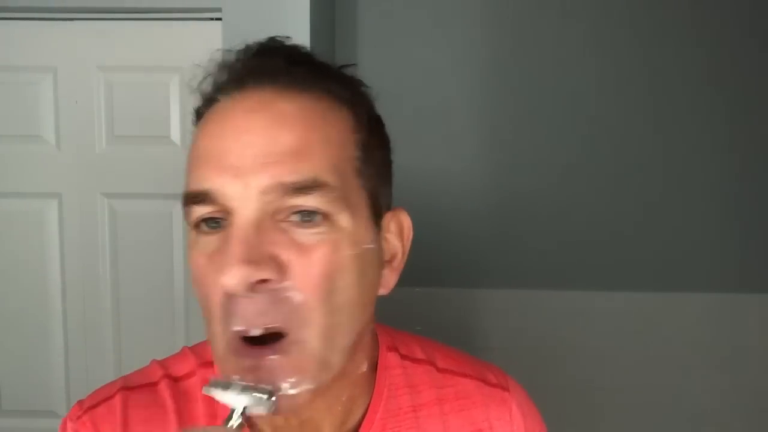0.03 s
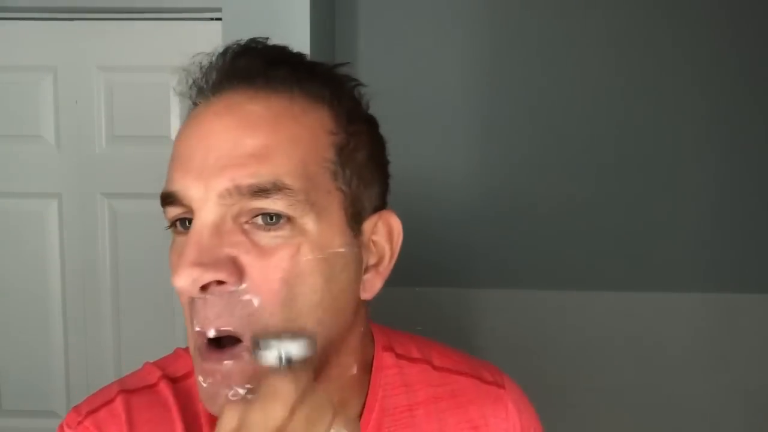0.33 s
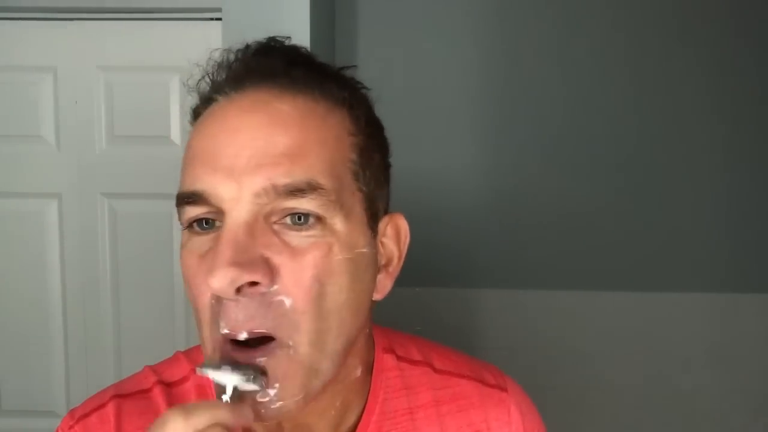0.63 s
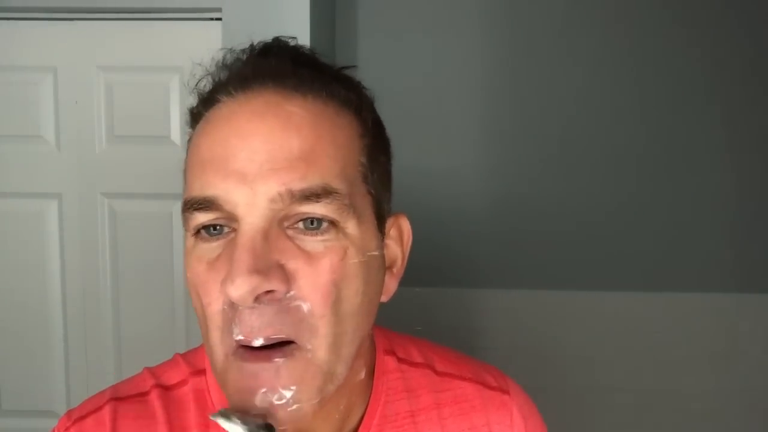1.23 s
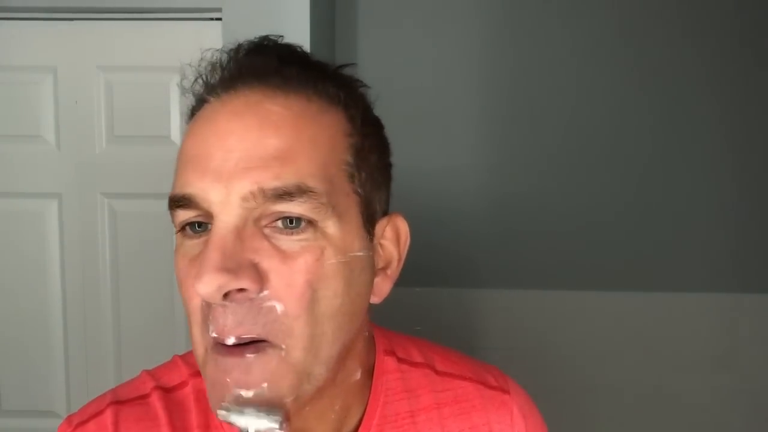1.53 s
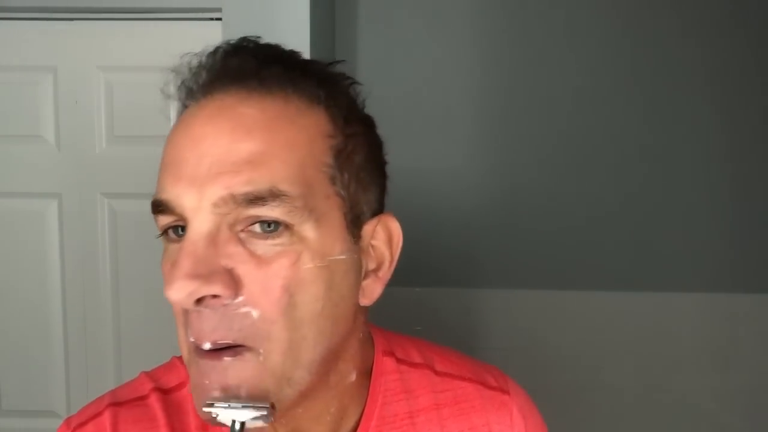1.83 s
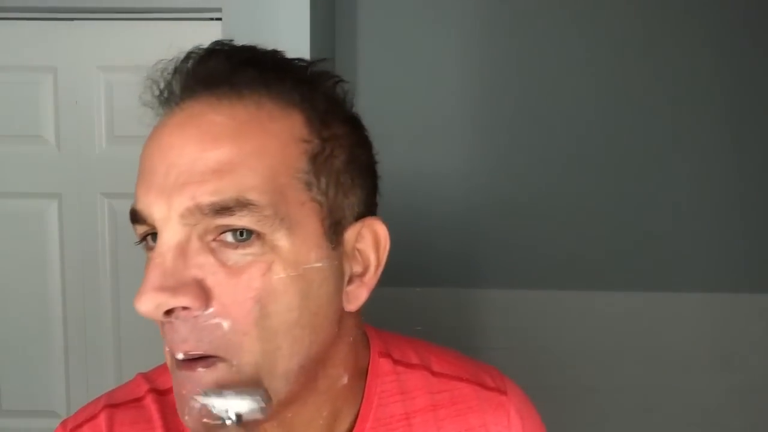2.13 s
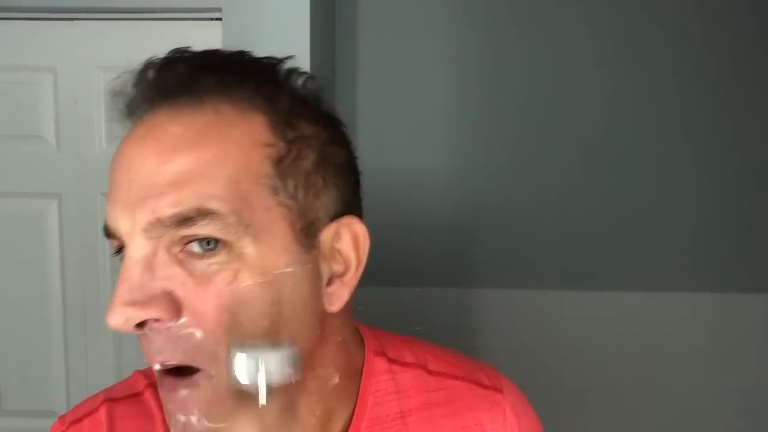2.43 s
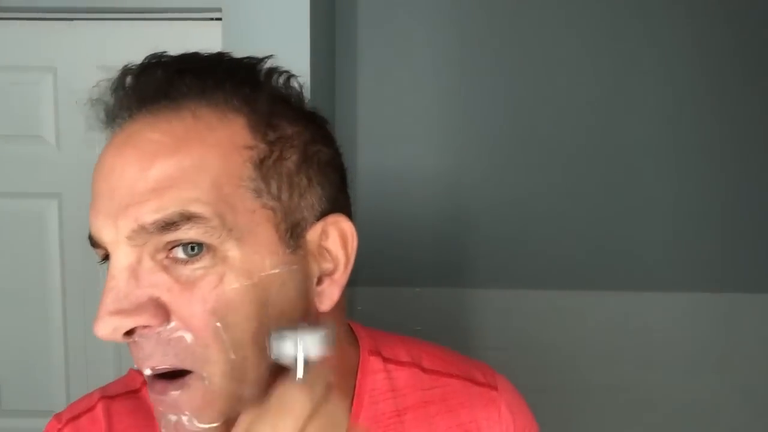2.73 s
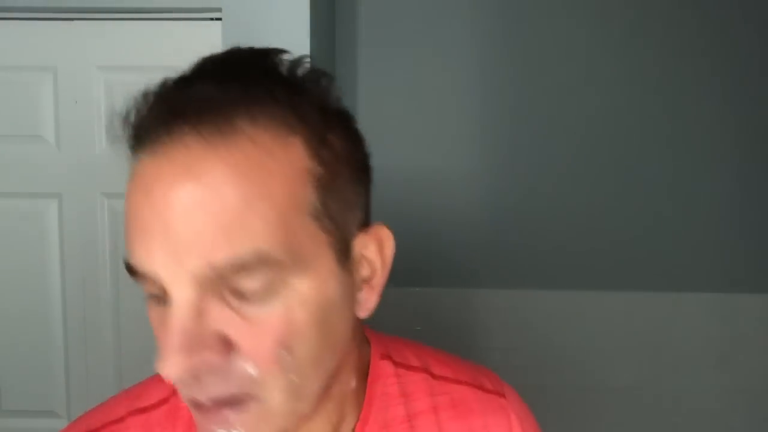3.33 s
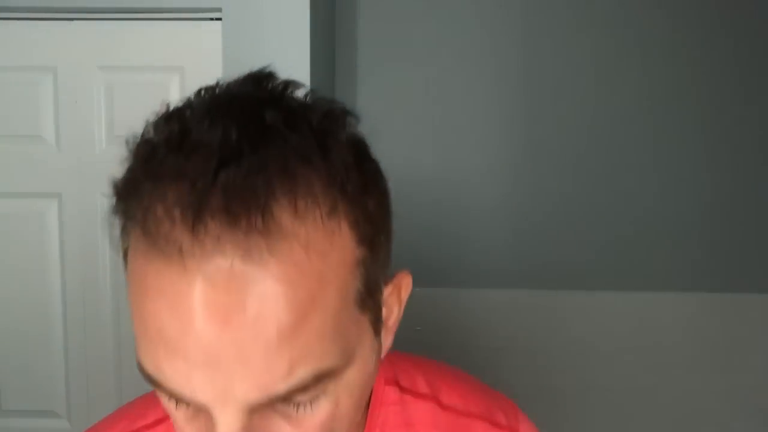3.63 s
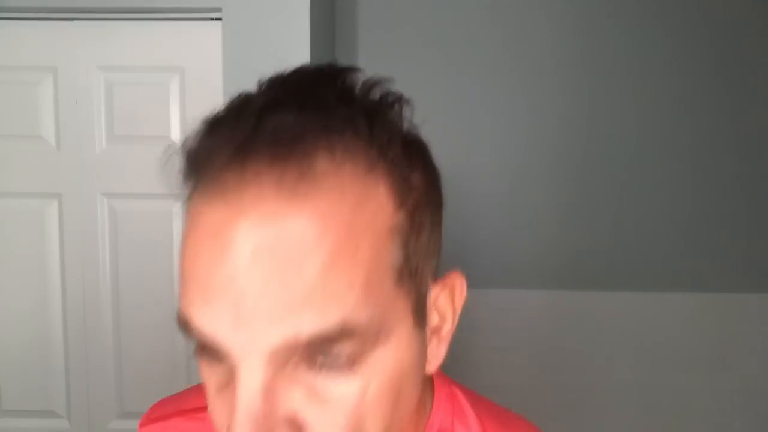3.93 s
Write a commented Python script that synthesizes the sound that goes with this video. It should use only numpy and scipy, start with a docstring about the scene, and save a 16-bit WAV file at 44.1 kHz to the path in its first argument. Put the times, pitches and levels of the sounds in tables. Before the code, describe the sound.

A razor scrapes stubble in about ten short, soft, crackly strokes from 0.3 to 3.5 seconds, the clearest near 1 and 1.6 seconds. Low ventilation rumbles underneath in a small bathroom, and a shirt rustles faintly. At about 3.8 seconds everything cuts out for an instant, then a much louder tap splashes into a basin with a gurgling drain until the end at 4 seconds.

```python
"""Shave, then a running tap.

A safety razor scrapes stubble in short strokes in a small hard-walled bathroom, over ventilation rumble
and a faint shirt rustle. Each stroke is a shower of hair snaps that ring the blade; stiff hairs tick
singly. After a brief dead silence a tap is running: spray spatters in the basin, the drain gurgles."""
import sys
import numpy as np
from scipy import signal
from scipy.fft import rfft, irfft, next_fast_len
from scipy.io import wavfile

SR = 44100
rng = np.random.default_rng(int(sys.argv[2]) if len(sys.argv) > 2 else 0)


def transcribe(u):
    """Save the signal u as a 16-bit wav file named by the first command-line argument.

    u: samples, shape (n,) or (channels, n), limited to [-1, 1]; the rate is SR.
    q: integer samples, one column per channel.
    """
    v = np.clip(np.atleast_2d(u).T, -1, 1)
    q = np.round(v * 32767).astype(np.int16)
    wavfile.write(sys.argv[1], SR, q)


N = 176400

# ventilation rumble (frequency [Hz], relative density [dB])
RUMBLE_SPECTRUM = [(15, -30), (25, -25.5), (60, -0.5), (96, -0.5), (128, 2), (162, -8), (189, -4),
                   (214, -12.5), (265, -8.5), (295, -10.5), (329, -18), (361, -12.5), (415, -17),
                   (565, -15), (659, -22), (857, -23.5), (1000, -32.5), (1300, -60.5), (2200, -120)]
# duct drone (frequency [Hz], width [Hz], relative level [dB])
DUCT_MODES = [(121.4, 14.5, -4), (185, 5.3, -6), (253.4, 15, -9.5), (293, 14, -11), (368, 10, -11)]
# room hiss (frequency [Hz], relative density [dB])
HISS_SPECTRUM = [(500, -28.5), (900, -2.5), (1150, 1), (1550, -4.5), (2200, -14), (3800, -16.5),
                 (7700, -9.5), (8300, -20), (15500, -12.5)]
# soft low swells (start [s], peak [s], decay [s], level [dB])
LOW_SWELLS = [(0.693, 0.765, 0.054, -54.5), (3.33, 3.364, 0.085, -54)]
# their resonance (frequency [Hz], width [Hz], relative level [dB])
LOW_SWELL_MODE = [(140, 6, 0)]
RUMBLE_DB, DUCT_DB, HISS_DB = -61, -67.5, -77.5

# shirt rustle (time [s], level [dB])
SHIRT_LEVELS = [(3.2, -72), (3.36, -70.5), (3.55, -71.5), (3.66, -68.5), (3.82, -68)]
# shirt rustle (frequency [Hz], relative density [dB])
SHIRT_SPECTRUM = [(400, 2), (1500, -3), (4500, -4.5), (8000, -9.5), (15000, -15.5)]

# razor strokes (landing [s], peak [s], decay [s], rasp cutoff [Hz], ring [dB], rasp [dB], edge [dB])
RAZOR_STROKES = [(0.34, 0.417, 0.0093, 6000, -89, -69.5, -67), (.335, 0.462, 0.028, 3600, -83, -59.5, -82),
                 (.7, 0.731, .05, 7000, -75, -74.5, -74), (0.921, 0.965, 0.016, 5970, -62, -65.5, -67),
                 (1.166, 1.18, 0.016, 9000, -76, -65, -75), (1.187, 1.231, 0.019, 5500, -78, -65, -73),
                 (1.516, 1.565, 0.014, 7900, -68, -57.5, -60.5),
                 (1.845, 1.864, 0.0096, 7040, -71, -61, -61), (2.266, 2.3, 0.034, 9000, -82, -84.5, -82),
                 (2.627, 2.65, 0.0094, 7800, -71.5, -59.5, -63),
                 (3.034, 3.102, .026, 8800, -93, -65.5, -67.5), (3.38, 3.43, 0.036, 9000, -89, -74.5, -75)]
# stiff hairs (time [s], ring [dB], rasp [dB], edge [dB])
HAIR_TICKS = [(.691, -78, -70, -71), (.708, -70, -69, -61), (.833, -88, -78, -68.5), (.929, -73, -75, -66),
              (.952, -67, -58.5, -66.5), (.9655, -50.5, -67, -68), (1.166, -83, -76, -66),
              (1.172, -70, -65, -72), (1.203, -61.5, -69, -82), (1.5274, -73, -57, -55.5),
              (1.534, -78, -66.5, -57), (1.563, -63, -58.5, -61), (1.57, -82, -72, -55),
              (1.8275, -74, -60.5, -75), (1.856, -74, -66, -58), (1.869, -63, -63, -69),
              (2.1463, -81, -72, -68), (2.59, -76, -57, -78)]
# blade ring (frequency [Hz], width [Hz], relative level [dB])
BLADE_MODES = [(2950, 140, -13), (3500, 130, 0), (3780, 170, -5), (4700, 300, -16), (5750, 400, -20)]
# rasp on skin (frequency [Hz], relative gain [dB])
RASP_SPECTRUM = [(300, -24), (850, -8), (1300, -9), (1900, -12), (2400, -7), (2950, 0), (4000, 0),
                 (4900, -1), (6200, -1), (7600, -3.5), (8600, -11), (16000, -24)]
# crisp snap at the edge (frequency [Hz], relative gain [dB])
EDGE_SPECTRUM = [(500, -30), (2500, -14), (5000, -6), (7500, -2), (10000, -3), (13000, 0), (15800, 1),
                 (17000, -30)]
TICK_RMS_SPAN_S, TICK_DECAY_S, TICK_GRIT_RATIO = .0026, .0007, 1.55

# bathroom reverberation (frequency [Hz], T60 [s])
ROOM_DECAY = [(200, 0.74), (3000, 0.35), (7000, 0.41), (15000, 0.32)]
ROOM_DB, ROOM_ONSET_S, ROOM_BLOCK_S = -6, .008, .3

# tap spray (frequency [Hz], relative density [dB])
SPRAY_SPECTRUM = [(530, -34), (900, -13.5), (1270, -15), (1470, -8.5), (2220, -13), (3460, -9), (3800, -6),
                  (4390, -7.5), (5060, -3.5), (6580, -7), (7060, -2), (7860, -5.5), (11800, -6),
                  (13300, -7), (15500, -7)]
# tap spray (time [s], gain [dB])
SPRAY_GAINS = [(3.85, -31.5), (3.9, -36.5), (3.95, -35.5), (4.0, -37)]
# splash resonances (frequency [Hz], width [Hz], relative level [dB])
SPLASH_MODES = [(5200, 200, 3), (6880, 150, 4.5), (7800, 240, 0), (8440, 74, -6)]
# hollow basin (frequency [Hz], width [Hz], relative level [dB])
BASIN_MODES = [(388, 16, -5), (492, 54, -3), (1446, 81, -11)]
# water drumming in the basin (frequency [Hz], relative density [dB])
POUR_SPECTRUM = [(30, -9), (65, 0.5), (130, 1.5), (190, -4.5), (250, 0.5), (400, -8), (550, -7.5),
                 (800, -9.5), (1200, -22.5), (2500, -35)]
BUBBLES_RE_DROPS_DB, SPLASH_RE_DROPS_DB, BASIN_DB, POUR_DB = -8.5, -10.5, -54, -45.5
BUBBLES_PER_S, BUBBLE_HZ, BUBBLE_LOG_SPREAD = 500, 7500, .5
BUBBLE_DECAY_CYCLES, BUBBLE_RISE_PER_DECAY = 14, .02

# large drain bubbles (time [s], frequency [Hz], gain [dB], decay [s])
DRAIN_GLUGS = [(3.885, 327, -32, 0.0073), (3.914, 263, -26.5, 0.0049), (3.977, 1417, -40.5, 0.011),
               (3.99, 255.6, -22, 0.016)]
DRAIN_HZ, DRAIN_DB, GLUG_ATTACK_S, GLUG_RISE_PER_S = 313.6, -46, .0046, 1.78

SILENCE_S, CUT_S, TAP_S, TAP_FADE_S = 3.826, .0011, 3.85, .046
BAND_LIMIT_HZ = 15800


def amp(db):
    """Decibels to gain."""
    return 10 ** (np.asarray(db) / 20)


def unit(x):
    """x at rms 1."""
    return x / np.sqrt(np.mean(x ** 2) + 1e-20)


def clock():
    """Sample times [s]."""
    return np.arange(N) / SR


def along(points, hz):
    """Interpolate (frequency [Hz], value) on a log axis."""
    points_hz, values = np.transpose(points)
    return np.interp(np.log(hz + 1), np.log(points_hz + 1), values)


def level(points):
    """Gain per sample from (time [s], level [dB])."""
    return amp(np.interp(clock(), *np.transpose(points)))


def coloured(x, spectrum=None, modes=()):
    """x through a minimum-phase filter of unit power: broad spectrum plus resonances."""
    size = 2 * next_fast_len(N)
    f = np.fft.rfftfreq(size, 1 / SR)
    power = amp(along(spectrum, f)) ** 2 if spectrum is not None else 0
    for hz, width_hz, db in modes:
        resonance = (f * width_hz) ** 2 / ((hz * hz - f * f) ** 2 + (f * width_hz) ** 2)
        power = power + amp(db) ** 2 * resonance / (1 + (f / (2 * hz)) ** 4)
    cepstrum = irfft(np.log(power / power.mean() + 1e-12) / 2)
    cepstrum[1:size // 2] *= 2
    cepstrum[size // 2 + 1:] = 0
    return irfft(rfft(x, size) * np.exp(rfft(cepstrum)))[:N]


def noise(spectrum=None, modes=()):
    """Coloured noise, rms 1."""
    return unit(coloured(rng.standard_normal(N), spectrum, modes))


def crackle(rate_per_s, spread_db, noise_ratio):
    """Random impulses of uneven size over smooth noise, rms 1."""
    hits = (rng.random(N) < rate_per_s / SR) * rng.choice([-1, 1], N)
    sizes = amp(spread_db * np.clip(rng.standard_normal(N), -2, 2))
    return unit(unit(hits * sizes) + noise_ratio * rng.standard_normal(N))


def swell(start_s, peak_s, decay_s):
    """Envelope: near-linear rise, exponential decay."""
    t = clock()
    rise = np.clip((t - start_s) / max(peak_s - start_s, 1 / SR), 0, 1) ** 1.1
    return rise * np.exp(-np.maximum(t - peak_s, 0) / decay_s)


def room_tone():
    """Ventilation rumble and duct drone, faint hiss, two soft low swells."""
    swells = sum(amp(db) * swell(*times_s) for *times_s, db in LOW_SWELLS) * noise(modes=LOW_SWELL_MODE)
    ventilation = amp(RUMBLE_DB) * noise(RUMBLE_SPECTRUM) + amp(DUCT_DB) * noise(modes=DUCT_MODES)
    return ventilation + amp(HISS_DB) * noise(HISS_SPECTRUM) + swells


def shirt():
    """Sliding cloth: faint throughout, louder as the shaver leans down."""
    return level(SHIRT_LEVELS) * noise(SHIRT_SPECTRUM)


def stiff_hair():
    """One snap plus a short burst of splintering."""
    t = np.arange(SR // 100) / SR
    snap = unit(1.0 * (t == 0))
    grit = unit(rng.standard_normal(len(t)) * np.exp(-t / TICK_DECAY_S))
    tick = snap + TICK_GRIT_RATIO * grit
    return tick * np.sqrt(TICK_RMS_SPAN_S * SR) / np.linalg.norm(tick)


def razor():
    """Hairs snap at the edge; each snap ticks crisply, rasps on the skin and rings the blade."""
    drive = np.zeros((3, N))
    snaps = crackle(rate_per_s=2200, spread_db=3.5, noise_ratio=.74)
    for start_s, peak_s, decay_s, cutoff_hz, *levels_db in RAZOR_STROKES:
        muffled = signal.sosfilt(signal.butter(2, cutoff_hz, fs=SR, output="sos"), snaps)
        bite = swell(start_s, peak_s, decay_s)
        drive += amp(levels_db)[:, None] * np.array([snaps, muffled, snaps]) * bite
    for start_s, *levels_db in HAIR_TICKS:
        tick = stiff_hair()
        drive[:, round(start_s * SR):][:, :len(tick)] += amp(levels_db)[:, None] * tick
    ring, rasp, edge = drive
    blade = coloured(ring, modes=BLADE_MODES)
    return blade + coloured(rasp, RASP_SPECTRUM) + coloured(edge, EDGE_SPECTRUM)


def bathroom(x):
    """x plus a short hard-wall tail, redrawn each block as the hand moves."""
    wet, block = np.zeros(N + SR), int(ROOM_BLOCK_S * SR)
    for i in range(0, N, block):
        hz, t, bands = signal.stft(rng.standard_normal(SR // 2), SR, nperseg=256)
        decay = amp(-60 * t / along(ROOM_DECAY, hz)[:, None])
        onset = 1 - np.exp(-t / ROOM_ONSET_S)
        tail = signal.istft(bands * decay * onset, SR, nperseg=256)[1]
        echo = signal.fftconvolve(x[i:i + block], tail / np.linalg.norm(tail))
        wet[i:i + len(echo)] += echo
    return x + amp(ROOM_DB) * wet[:N]


def tap():
    """The jet spatters into drops and bubbles and drums on the hollow basin."""
    drops = crackle(rate_per_s=2200, spread_db=5, noise_ratio=.77)
    spray = unit(coloured(drops, SPRAY_SPECTRUM)) + amp(BUBBLES_RE_DROPS_DB) * bubbles()
    spray += amp(SPLASH_RE_DROPS_DB) * noise(modes=SPLASH_MODES)
    basin = amp(BASIN_DB) * noise(modes=BASIN_MODES) + amp(POUR_DB) * noise(POUR_SPECTRUM)
    return level(SPRAY_GAINS) * spray + basin


def bubbles():
    """Tiny air bubbles ping in the splash, each rising slightly in pitch."""
    out, t = np.zeros(N + SR), np.arange(SR // 50) / SR
    span_s = N / SR - TAP_S
    for when, pitch_a, pitch_b, size in rng.random((int(BUBBLES_PER_S * span_s), 4)):
        hz = BUBBLE_HZ * np.exp(BUBBLE_LOG_SPREAD * (pitch_a + pitch_b - 1))
        age = t * hz / BUBBLE_DECAY_CYCLES
        ping = np.sin(2 * np.pi * hz * t * (1 + BUBBLE_RISE_PER_DECAY * age / 2)) * np.exp(-age)
        out[int((TAP_S + when * span_s) * SR):][:len(t)] += size ** 2 * ping
    return out[:N] / out[int(TAP_S * SR):N].std()


def drain():
    """The pipe sings one hollow tone; large bubbles glug in it."""
    out = amp(DRAIN_DB) * np.sqrt(2) * np.sin(2 * np.pi * (DRAIN_HZ * clock() + rng.random()))
    for start_s, hz, db, decay_s in DRAIN_GLUGS:
        t = np.maximum(clock() - start_s, 0)
        envelope = np.exp(-t / decay_s) * (1 - np.exp(-t / GLUG_ATTACK_S))
        out += amp(db) * envelope * np.sin(2 * np.pi * hz * t * (1 + GLUG_RISE_PER_S * t / 2))
    return out


def scene():
    """The shave stops dead; brief silence; running water fades in fast. Mono."""
    t = clock()
    shave = (bathroom(razor()) + room_tone() + shirt()) * np.clip((SILENCE_S - t) / CUT_S, 0, 1)
    water = (tap() + drain()) * np.clip((t - TAP_S) / TAP_FADE_S, 0, 1)
    return (shave + water)[None]


def record(dry):
    """Steep low-pass at the band limit."""
    return signal.sosfilt(signal.ellip(12, .1, 80, BAND_LIMIT_HZ, fs=SR, output="sos"), dry)


dry = scene()
out = record(dry)
transcribe(out)
```